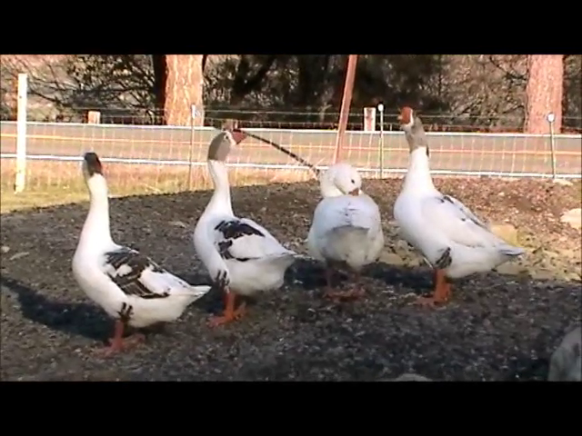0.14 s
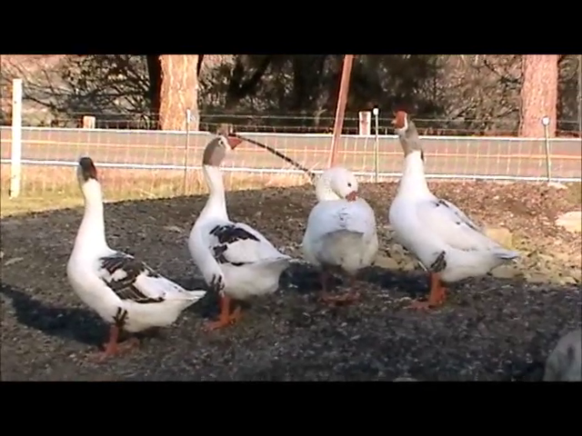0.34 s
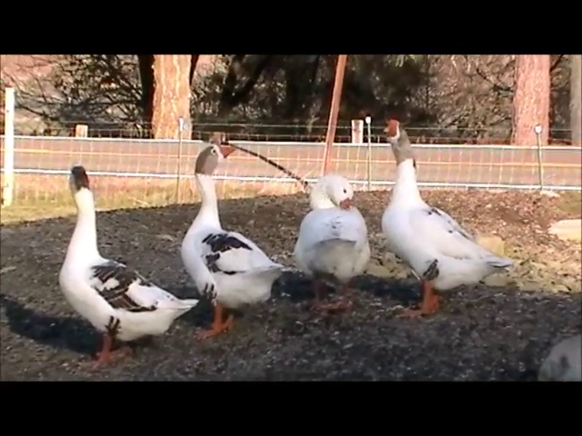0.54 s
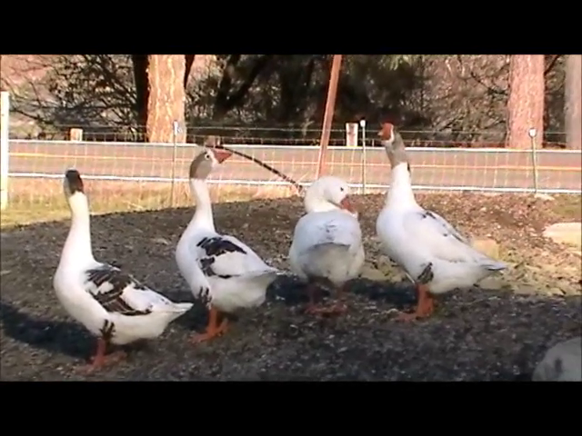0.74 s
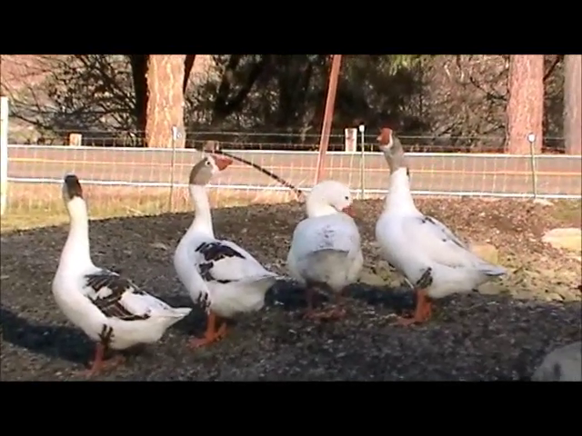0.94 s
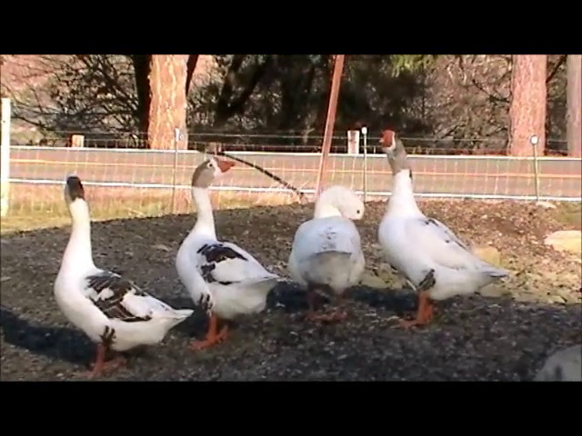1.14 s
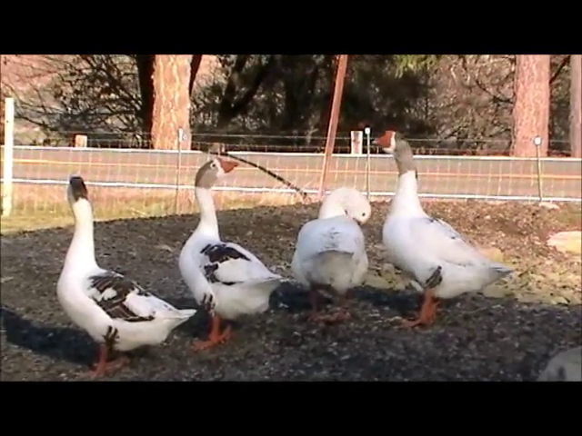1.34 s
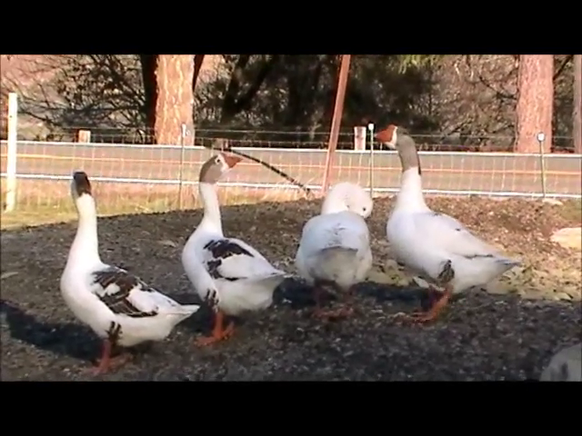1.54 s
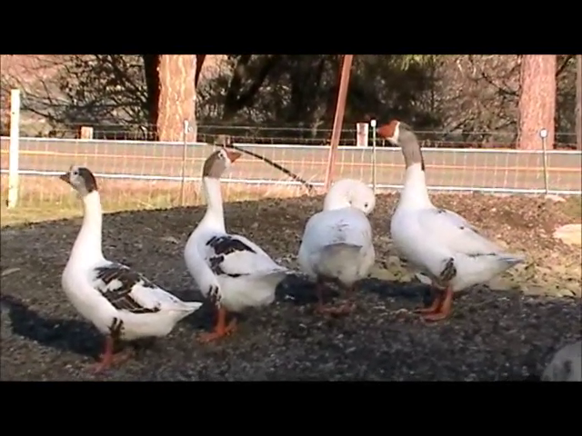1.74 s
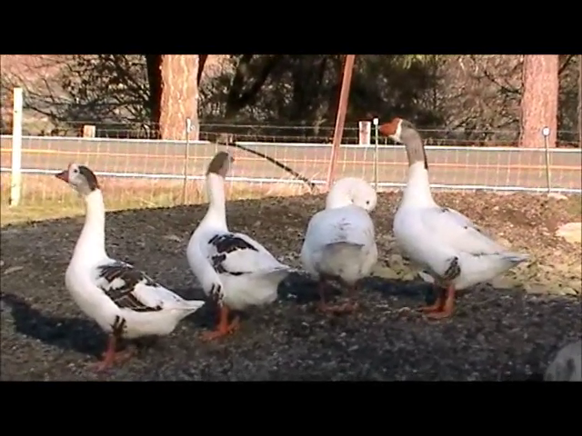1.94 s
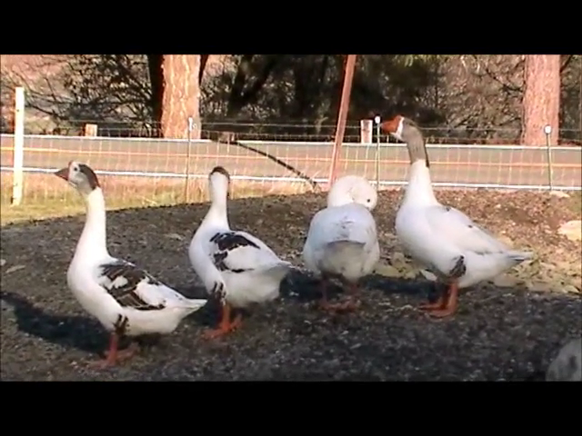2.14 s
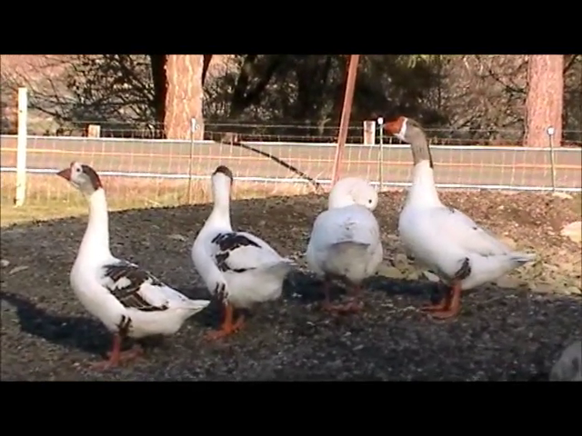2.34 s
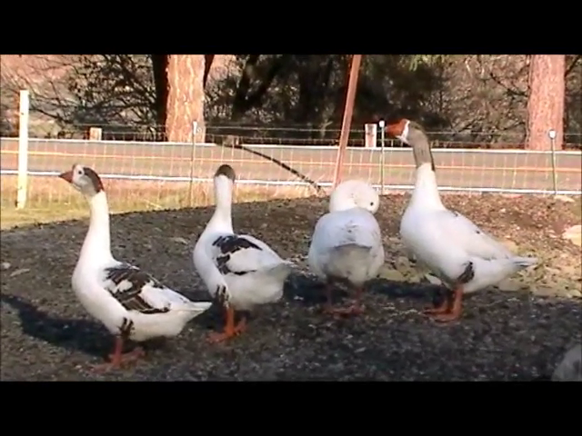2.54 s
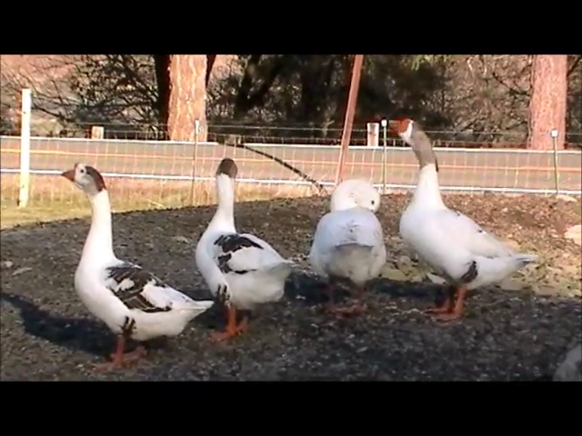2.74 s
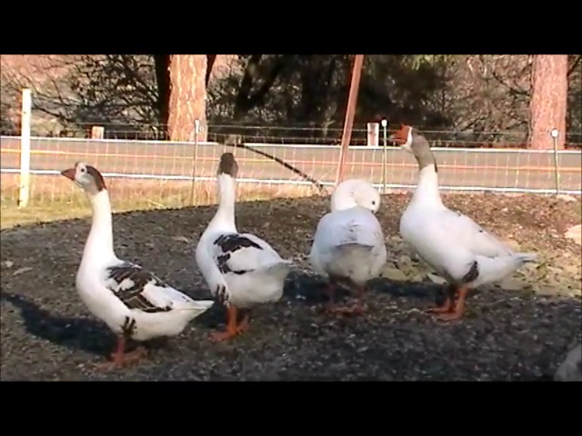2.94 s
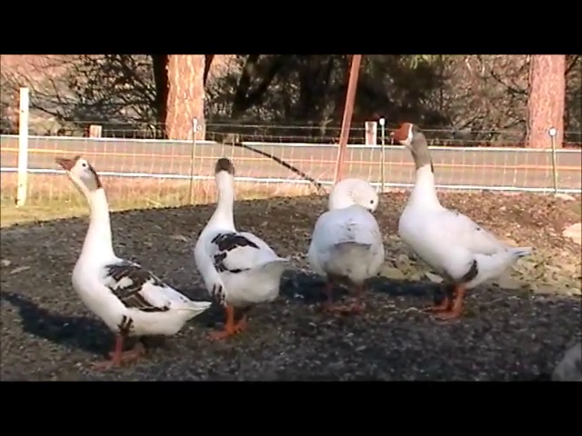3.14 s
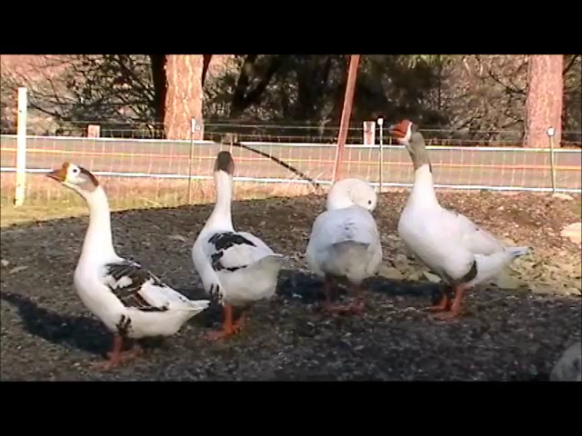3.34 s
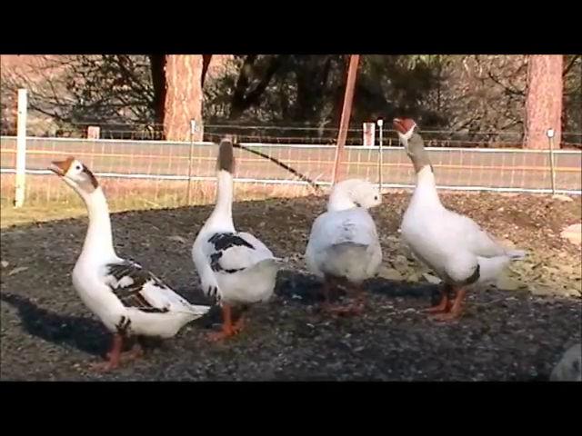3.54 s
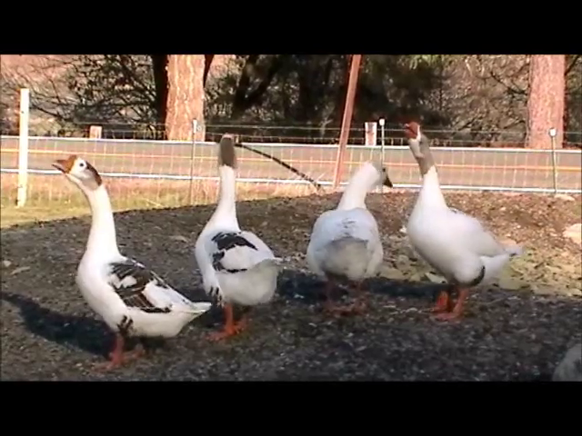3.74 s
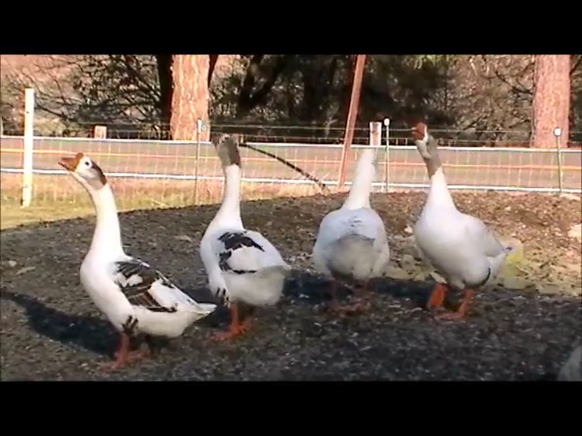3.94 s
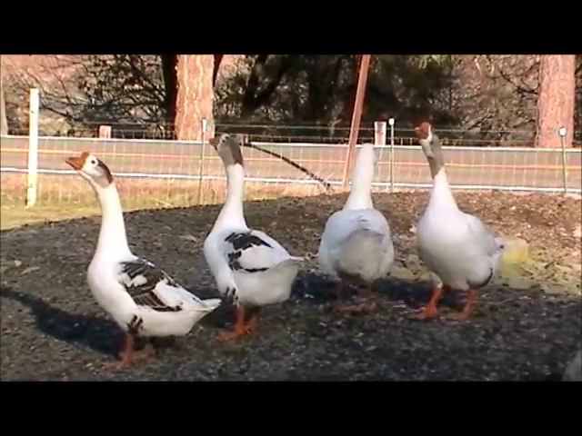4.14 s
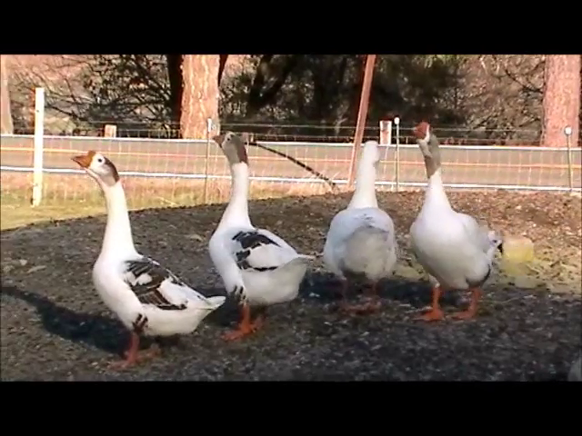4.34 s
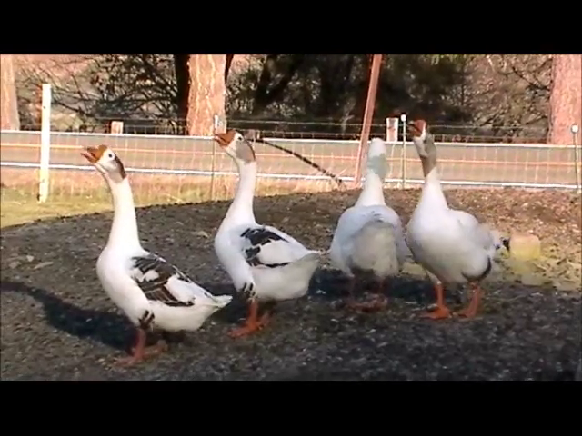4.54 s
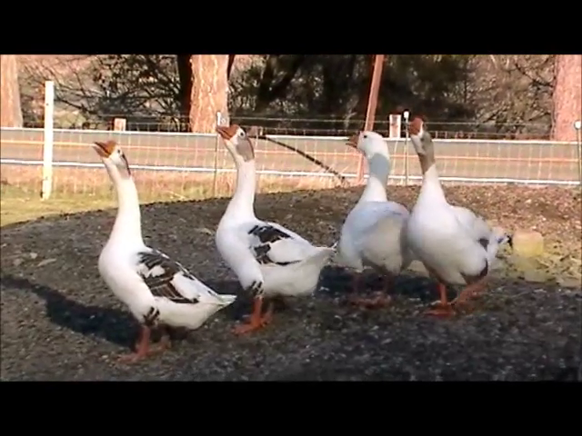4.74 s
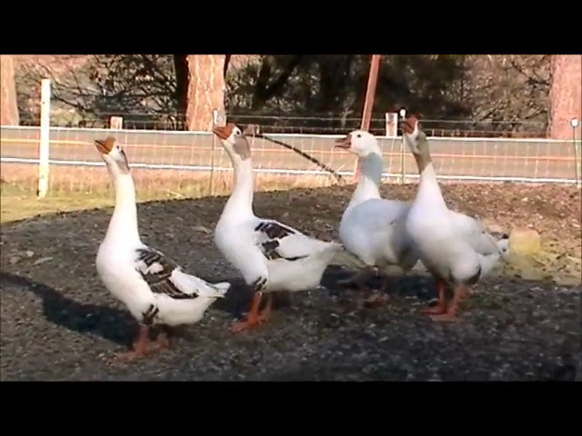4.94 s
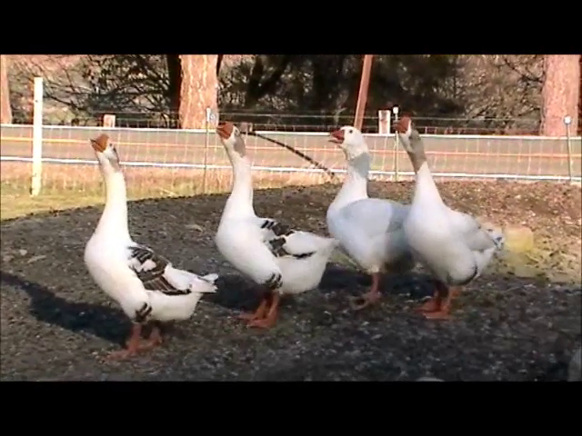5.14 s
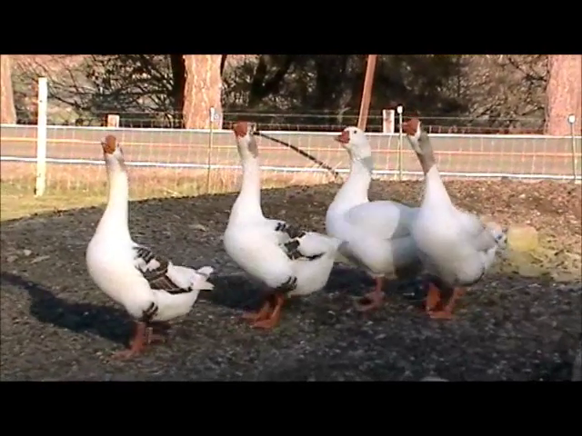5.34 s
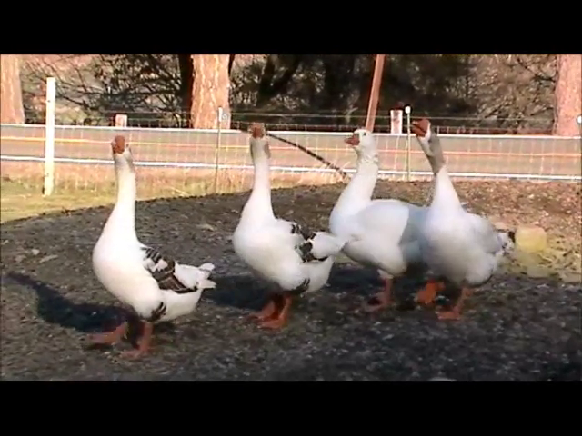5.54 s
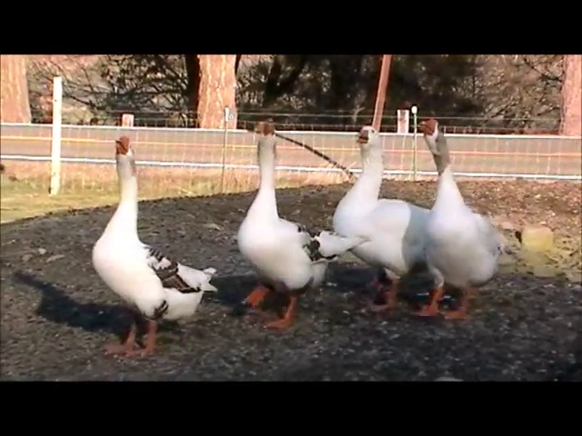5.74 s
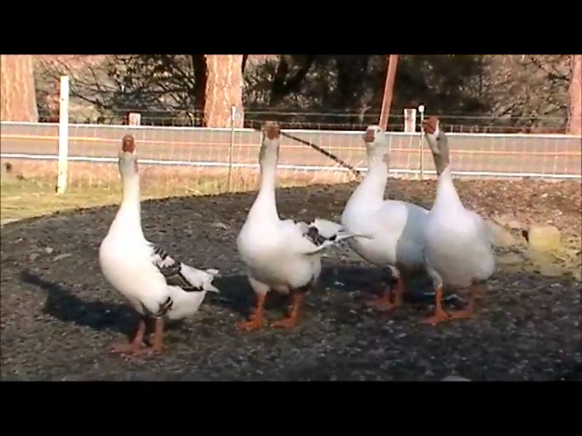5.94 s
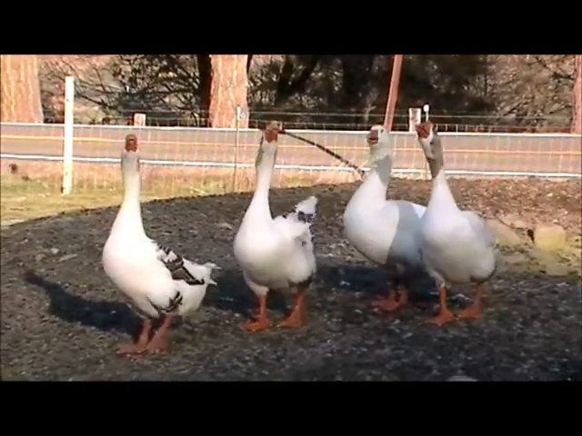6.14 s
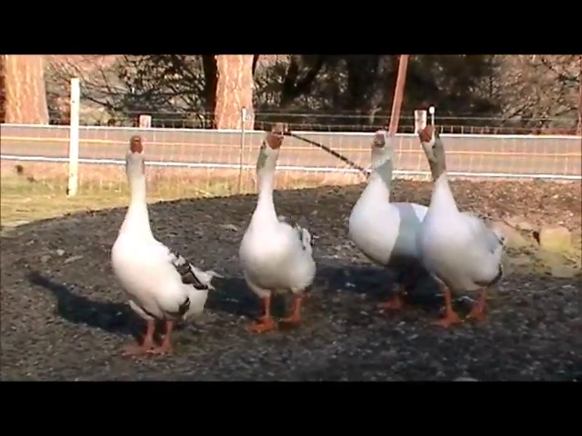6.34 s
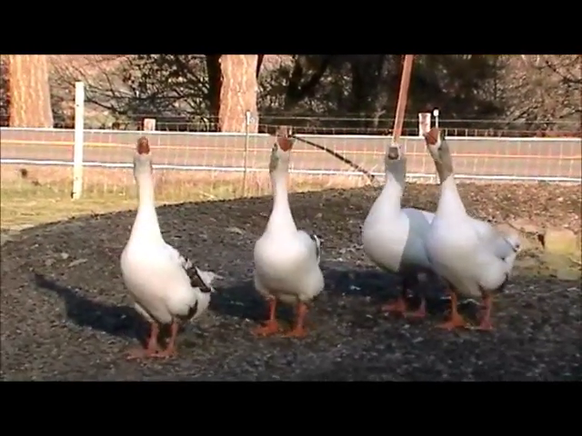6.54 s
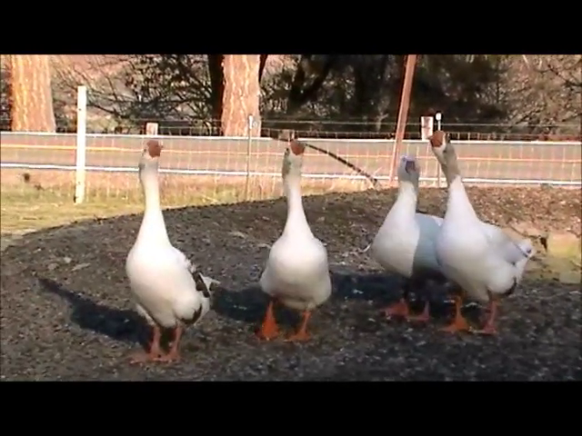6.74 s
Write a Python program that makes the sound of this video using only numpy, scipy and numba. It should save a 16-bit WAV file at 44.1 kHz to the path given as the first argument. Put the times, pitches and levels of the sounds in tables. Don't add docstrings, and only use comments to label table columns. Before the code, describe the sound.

Geese a few metres away honk in raspy, reedy bursts over soft outdoor hiss, with feet crunching gravel between the louder calls.

```python
import sys
import numpy as np
from scipy import signal
from scipy.fft import rfft, irfft
from scipy.io import wavfile
from scipy.ndimage import uniform_filter1d
from numba import njit

SR = 44100
rng = np.random.default_rng(int(sys.argv[2]) if len(sys.argv) > 2 else 0)


def boost_factor(decibels):
    exponent = np.asarray(decibels, float) / 20
    return 10 ** exponent


def dump(signal):
    limited = np.clip(np.atleast_2d(signal).T, -1, 1)
    pcm = np.round(limited * 32767).astype(np.int16)
    wavfile.write(sys.argv[1], SR, pcm)


N = 303408
TIME = np.arange(N) / SR

# (start [s], length [s], pipe level [dB], slap rate [Hz], fade over the syllable [dB])
HONKS = [(1.81, 0.17, -50, 154.3, 1), (1.915, 0.18, -36.5, 159.5, 28.5), (2.105, 0.22, -36, 165.3, 5),
         (2.31, .105, -42, 156, 11.5), (2.9, 0.096, -64, 155.1, -13), (2.985, 0.19, -31, 164.8, 20),
         (3.146, .19, -33.5, 156.3, 7.5), (3.452, 0.07, -46.5, 178.9, -3.5),
         (3.592, 0.058, -24.5, 168.5, 14.5), (3.66, 0.13, -43.5, 171.7, 0.5),
         (3.803, 0.048, -28.5, 183.7, 13), (3.925, 0.16, -35, 176.5, 2), (4.526, 0.15, -27, 184.3, 10.5),
         (4.645, .11, -28, 178.8, 10), (4.75, .18, -38.5, 175.1, 11), (4.953, 0.15, -48.5, 185.5, -8),
         (5.11, 0.15, -32, 169.2, 14), (5.585, 0.18, -32, 184.3, 8), (5.73, 0.18, -27, 174.8, 16),
         (5.91, 0.065, -60.5, 173.3, 15), (6.1, .17, -34.5, 182, -1.5), (6.265, .2, -29, 172, 16.5)]


@njit
def svf(x, hz, width):
    y = np.empty(len(x))
    b, l = 0., 0.
    for i in range(len(x)):
        g, k = np.tan(np.pi * hz[i] / SR), width / hz[i]
        v = (b + g * (x[i] - l)) / (1 + g * (g + k))
        b, l = 2 * v - b, l + 2 * g * v
        y[i] = k * v
    return y


def band(x, hz, width):
    hz = hz + np.zeros(len(x))
    return svf(svf(x, hz, 1. * width), hz, 1. * width)


def unit(x):
    return x / np.sqrt(np.mean(x ** 2))


def wander(count, rate):
    k = int(SR / rate)
    return unit(uniform_filter1d(uniform_filter1d(rng.standard_normal(count), k), k))


def shaped(points):
    hz, db = np.transpose(points)
    f = np.maximum(np.arange(N // 2 + 1) * SR / N, 1)
    return rfft(rng.standard_normal(N)) * boost_factor(np.interp(np.log(f), np.log(hz), db)), f


def note(start, length, fade):
    i = np.arange(int(start * SR), int((start + length) * SR))
    t = i / SR - start
    return i, t, length - t, np.clip(np.minimum(t, length - t) / fade, 0, 1)


def edges(t, left, attack, release):
    return np.clip(1 - t / attack, 0, 1) + np.clip(1 - left / release, 0, 1)


def air():
    # (frequency [Hz], level [dB per Hz])
    hiss_curve = [(15, -53), (25, -33), (70, -1), (352, 0), (710, -2.5), (2260, -5.5), (2810, -10),
                  (15800, -20.5)]
    # (frequency [Hz], side minus mid [dB])
    spread_curve = [(60, 2.5), (300, 2), (2400, -1.5), (5000, -15.5), (15000, -4.5)]
    # (frequency [Hz], width [Hz], level [dB])
    whine_bands = [(2396, 37, -78), (4680, 150, -85), (10050, 150, -94), (12500, 100, -83)]
    hiss_db = -66
    mid, f = shaped(hiss_curve)
    side, _ = shaped(hiss_curve)
    spread_hz, spread_db = np.transpose(spread_curve)
    side = side * boost_factor(np.interp(np.log(f), np.log(spread_hz), spread_db))
    mid, side = irfft(mid, N), irfft(side, N)
    gain = boost_factor(hiss_db + 0.15 * wander(N, 13.0)) / np.sqrt(np.mean(mid ** 2))
    whine = np.zeros(N)
    for hz, width, db in whine_bands:
        whine += boost_factor(db + 2 * wander(N, 3.6)) * unit(band(rng.standard_normal(N), hz, width))
    return gain * np.array([mid + side, mid - side]) + whine


def yard(x):
    # (delay [s], level [dB])
    echo_taps = [
        (0.332, -32),
        (.41, -35),
        (.52, -37.5),
    ]
    t = TIME[:60000]
    tail = np.exp(-t / 0.86) * np.clip(t / 0.15, 0, 1)
    response = boost_factor(-67.5) * rng.standard_normal((2, len(t))) * tail
    response[1] = 0.49 * response[0] + 0.58 * response[1]
    for delay, db in echo_taps:
        at = int(delay * SR)
        smear = rng.standard_normal(1500) * np.exp(-t[:1500] / .012)
        response[:, at:at + 1500] += boost_factor(db - 25.0) * smear
    dull = signal.sosfilt(signal.butter(2, [550, 3600], "band", fs=SR, output="sos"), x)
    return signal.fftconvolve(dull[None], response, axes=1)[:, :N]


def steps():
    # (time [s], thud level [dB], thud pitch [Hz], grit level [dB])
    footfalls = [
        (1.48, -48, 238, -52),
        (2.755, -38, 167, -35),
        (3.401, -39, 211.6, -42.5),
        (4.139, -90, 171, -37.5),
        (4.198, -58, 177, -38.5),
        (4.297, -37, 220, -38),
        (4.442, -51, 205.5, -41),
        (5.415, -54, 390, -34.5),
    ]
    out, t = np.zeros(N), TIME[:3000]
    for start, db, hz, grit_db in footfalls:
        thud = boost_factor(db) * np.sin(2 * np.pi * hz * t) * np.exp(-t / 0.0047) * np.clip(t / 0.00083, 0, 1)
        grit = boost_factor(grit_db - 6) * band(rng.standard_normal(3000), 1570.0, 3700.0) * np.exp(-t / 0.012)
        out[int(start * SR):][:3000] += svf(thud, hz + 0 * t, 440.0) + grit
    return out


def squeaks():
    # (time [s], level [dB], pitch [Hz], length [s])
    peeps = [
        (4.527, -29.5, 2857, 0.0081),
        (4.949, -28.5, 3070, 0.0091),
        (5.5826, -21.5, 2820, 0.0099),
        (6.098, -23.5, 2773, 0.019),
    ]
    out, t = np.zeros(N), TIME[:2000]
    for start, db, hz, length in peeps:
        phase = 2 * np.pi * hz * (t + 1.57 * t ** 2) + 0.97 * wander(2000, 530)
        shape = np.clip(t / 0.0027, 0, 1) * np.clip((length + 0.007 - t) / 0.0048, 0, 1)
        out[int(start * SR):][:2000] += boost_factor(db) * shape * (np.sin(phase) + 0.44 * np.sin(2 * phase))
    return out


def whistles(turns):
    # (start [s], length [s], first pitch [Hz], held pitch [Hz], fundamental [dB])
    reeds = [(1.823, 0.14, 711, 828, -49), (1.996, 0.2, 762, 793, -52.5), (2.888, 0.21, 1042, 1221, -46.5),
             (3.25, .095, 1213, 1206, -33.5), (3.461, 0.068, 1235, 1342, -35),
             (3.505, 0.11, 1610, 1713, -26), (3.597, 0.11, 771, 828, -44), (3.606, 0.14, 1168, 1312, -36.5),
             (3.681, 0.091, 1916, 1940, -30.5), (3.74, 0.068, 852, 818, -37.5),
             (3.81, 0.053, 1700, 1829, -40), (3.845, 0.0964, 1702, 1771, -26), (4.704, 0.25, 932, 968, -39),
             (4.72, 0.17, 829, 863.4, -35), (4.675, 0.14, 1205, 1268, -41),
             (4.959, 0.14, 1643, 1779, -31.5), (5.05, 0.091, 1214, 1269, -33.5),
             (5.129, 0.14, 922, 937, -31), (5.74, 0.23, 618, 649.6, -79), (5.949, 0.046, 982, 763, -44),
             (6.245, .24, 1235, 1304, -37), (6.341, 0.14, 2322, 2286, -38.5),
             (3.945, .155, 1195, 1306, -36), (3.935, .16, 678, 694, -44.5)]
    # (partials 2, 3, 4 [dB re the fundamental], upper series [dB re the third or fourth],
    # final droop of pitch [0-1])
    reed_tones = [(-12, -13, -32, -10, .08), (-22, -13, -42, -18, .001), (-22, -22, -35, -0.5, 0.2),
                  (2.5, -10.5, -13.5, -16.5, .09), (-2, -8, -34, -14, 0), (-14, -15, -9, -12.5, .001),
                  (9.5, 7, 8, -19, 0.03), (-7, -10, -18, -21, 0.09), (-11.5, -30.5, -32, 3, .02),
                  (-10, -4.5, -23, -24, 0.05), (11, -1.5, -2, -11, .001), (-16, -11, -7.5, -13, 0.03),
                  (2, -11, -4.5, 4, 0.24), (-18, -44, -29, -16, 0.04), (1, -22, -31, -25, .001),
                  (-9, -23, -13, -13, 0.03), (-9.5, -18, -30, -5, .001), (-15, -10, -16, -16, .19),
                  (41.5, 23, 41, -10, .02), (-19, -1, -25, -5.5, 0.05), (-3, -10, -13, -7, .11),
                  (-9, -17, -56, -11, 0.05), (-4.5, -13, -22, -12, .08), (0, -1.5, -10, -15, 0.14)]
    glide_share, glide_bend = .92, 1.35
    break_hz, droop_s = 1500, 0.0515
    droop_db, shrill_droop_db = 45, 220
    attack_share, release_s, edge_db = 0.22, 0.021, 7.5
    swell_db, throb, breath_db = 10, .13, -26
    out = np.zeros(N)
    for (start, length, first_hz, held_hz, db), (*above_db, shrill_db, droop) in zip(reeds, reed_tones):
        i, t, left, gate = note(start, length, .007)
        droop = droop * (held_hz < break_hz) * np.clip(1 - left / droop_s, 0, 1) ** 1.64
        glide = np.clip(1 - t / (glide_share * length), 0, 1) ** glide_bend
        hz = (held_hz + (first_hz - held_hz) * glide) * (1 - droop)
        wobble = .15 * (hz / 1700) ** 1.5 * np.sin(2 * np.pi * turns[i])
        phase = 2 * np.pi * np.cumsum(hz * (1 + .0015 * wander(len(i), 150))) / SR + wobble

        db = db - edge_db * edges(t, left, attack_share * length, release_s) - droop_db * droop
        db = db + np.c_[[0, *above_db]]
        swell = swell_db * (t / length - .5)
        top_db = np.maximum(db[2], db[3]) + shrill_db
        top_db = np.minimum(top_db, np.maximum(db[0], db[1]) - 4)
        top_db = top_db + swell - shrill_droop_db * droop
        db[1:] += swell / 2

        gate = gate * (1 + throb * np.cos(2 * np.pi * turns[i]))
        breath = unit(band(rng.standard_normal(len(i)), 3100.0, 13500.0))
        out[i] += gate * boost_factor(db.max(axis=0) + breath_db) * breath
        for k in range(1, 17):
            level_db = db[k - 1] if k < 5 else top_db - 2.2 * (k - 6) * hz / 1000
            size = boost_factor(level_db + 4 + 1.5 * wander(len(i), 60)) * (k * hz < 15500)
            out[i] += gate * size * np.sin(k * phase + k * k)
    return out


def slap_phase():
    sag_hz_per_s = 40
    rate = np.full(N, 1. * HONKS[0][3])
    for start, length, _, hz, _ in HONKS:
        later = TIME >= start
        rate[later] = hz - sag_hz_per_s * np.minimum(TIME[later] - start, length)
    return np.cumsum(rate * (1 + .012 * wander(N, 60))) / SR


def membrane(turns):
    cycle = np.floor(turns).astype(int)
    size = boost_factor(1.6 * rng.standard_normal(cycle[-1] - cycle[0] + 1))[cycle - cycle[0]]
    hits = size * np.diff(cycle, prepend=cycle[0])
    rattles = rng.standard_normal((2, 400)) * np.exp(-TIME[:400] / .0022)
    blend = 1.1 * wander(len(turns), 14)
    slaps = np.zeros(len(turns))
    for weight, rattle in zip((np.cos(blend), np.sin(blend)), rattles):
        slaps += np.convolve(hits * weight, rattle)[:len(turns)]
    puffs = size * (.5 + np.exp(-(turns % 1) / .5)) * rng.standard_normal(len(turns))
    return unit(slaps), unit(puffs), size


def windpipe(clear, hz, width, rough):
    main = band(band(clear, hz, 1.5 * width), hz, 2 * width)
    return unit(main + .33 * rough ** .5 * band(clear, 540., 110.))


def beak_ring(clear, hoarse, hz):
    return unit(band(clear, hz, 480.) + .4 * band(band(hoarse, 2100., 1900.), 2100., 2600.))


def blare_ring(hoarse, modes_hz, ring, size, turns):
    # (frequency [Hz], width [Hz], level [dB])
    blare_bands = [(3790, 147, 12), (4340, 190, 9.5), (6080, 980, 9), (6630, 4760, 14), (8500, 1500, -16)]
    overtones, wide = np.zeros(len(turns)), np.zeros(len(turns))
    for k in range(3, 7):
        overtones += (-1) ** k * svf(hoarse, k * modes_hz / 2, 207.0) / (k - 2) ** .5
    for hz, width, db in blare_bands:
        wide += boost_factor(db) * band(rng.permutation(hoarse), hz, 2 * width) / width ** .5
    wide = wide * (size + np.cos(2 * np.pi * turns) / 2)
    treble = signal.butter(4, 2900, "high", fs=SR, output="sos")
    return unit(signal.sosfilt(treble, ring * unit(overtones) + (1 - ring) * unit(wide)))


def rasp(turns):
    # (turbulent share [0-1], beak [Hz], beak [dB], blare [dB], chest [dB]),
    # levels relative to the pipe
    throats = [(.08, 1870, -17.5, -13.5, -24), (.08, 2420, -27, -37, -25), (.08, 2340, -15, -23, -24),
               (0.079, 2280, -31, -27, -13), (.14, 2410, 1, -8, -21), (.14, 2030, -19, -21.5, -17.5),
               (.14, 2257, -5, -11.5, -13), (.4, 2510, 8.5, 8, -12.5), (.4, 1930, -6, -3.5, -16.5),
               (.4, 2235, 3.5, -2, -21), (.1, 2294, -9, 0, -21), (.1, 2280, -0.5, -3, -25),
               (.22, 1787, -3, -4, -13), (.22, 1938, -1, -0.5, -16.5), (.22, 2300, -1.5, 0.5, -19),
               (.25, 1863, 12, 14.5, -8.5), (.35, 2214, -0.7, -3.5, -14.5), (.15, 1750, 1.5, 1.8, -8.5),
               (.22, 1970, -4.5, -1, -16.5), (.22, 2230, 18, 22.5, -1), (.18, 1760, 2, 3, -12),
               (.24, 2131, -3, -1.5, -21.5)]
    soft_db, loud_db = -60, -32
    pipe_ends_hz, width_ends_hz, ring_ends = (930, 1000), (260, 460), (.9, .6)
    pipe_attack_s, blare_attack_s, edge_db = 0.021, 0.0065, 25
    release_s, blare_release_s = .025, 0.035
    lazy_attack = 2.6
    treble_fade, chest_fade = 0.52, 1.02
    snap_hz, snap_s = 373, 0.016
    rise, rise_s = 0.244, 0.024
    out, chest = np.zeros(N), np.zeros(N, complex)
    next_starts = np.append(np.transpose(HONKS)[0], np.inf)[1:]
    for honk, throat, after in zip(HONKS, throats, next_starts):
        start, length, db, _, fade_db = honk
        rough, beak_hz, beak_db, blare_db, chest_db = throat
        i, t, left, gate = note(start, length + release_s, .003)
        last = after > start + length + release_s
        fresh = not out[i[0] - 1]

        force_db = db + blare_db
        pipe_hz = np.interp(force_db, (soft_db, loud_db), pipe_ends_hz)
        width = np.interp(force_db, (soft_db, loud_db), width_ends_hz)
        ring = np.interp(force_db, (soft_db, loud_db), ring_ends)
        lazy = np.interp(force_db, (soft_db, soft_db + 10), (lazy_attack, 1))

        slow = db - edge_db * edges(t, left, pipe_attack_s * lazy, release_s)
        quick_release = blare_release_s if last else release_s
        quick = db - edge_db * edges(t, left, blare_attack_s * lazy, quick_release)
        fade_db = fade_db * t / length
        pipe_db = slow - fade_db
        chest_db = slow + chest_db - chest_fade * fade_db
        beak_db = (slow + quick) / 2 + beak_db - treble_fade * fade_db
        blare_db = quick + blare_db - treble_fade * fade_db

        modes_hz = beak_hz * (1 - rise * fresh * np.exp(-t / rise_s))
        beak_hz = beak_hz + snap_hz * np.exp(-t / snap_s)
        pipe_hz = pipe_hz * (1 - .2 * last * np.exp((i - i[-1]) / SR / .05))

        slaps, puffs, size = membrane(turns[i])
        clear = (1 - rough) ** .5 * slaps + rough ** .5 * puffs
        hoarse_share = rough ** .5
        hoarse = (1 - hoarse_share) ** .5 * slaps + hoarse_share ** .5 * puffs
        pipe = windpipe(clear, pipe_hz, width, rough)
        beak = beak_ring(clear, hoarse, beak_hz)
        blare = blare_ring(hoarse, modes_hz, ring, size, turns[i])
        out[i] += gate * (boost_factor(pipe_db) * pipe - boost_factor(beak_db) * beak + boost_factor(blare_db) * blare)
        tremble = boost_factor(3.5 * wander(len(i), 58))
        chest[i] += gate * tremble * boost_factor(chest_db + 3) * np.exp(2j * np.pi * turns[i])
    return out, chest


def scene():
    turns = slap_phase()
    voice, chest = rasp(turns)
    voice = voice + whistles(turns) + squeaks()
    side = boost_factor(-17.0) * svf(voice, 1140.0 + 0 * TIME, 1220.0)
    side -= boost_factor(-13) * svf(voice, 110.0 + 0 * TIME, 580.0)
    side += boost_factor(-28.5) * np.roll(voice, 5)
    ports = np.array([[boost_factor(-3.5) * np.exp(.4j)], [boost_factor(-1.0) * np.exp(-.4j)]])
    hum = np.real(chest * ports)
    return voice + np.array([side, -side]) + hum + yard(voice) + steps() + air()


def band_limit(x):
    return signal.sosfilt(signal.butter(12, 15950, fs=SR, output="sos"), x)


def record(dry):
    mic_top_hz = 11400
    mix = signal.sosfilt(signal.butter(1, mic_top_hz, fs=SR, output="sos"), dry)
    return band_limit(mix)


dry = scene()
out = record(dry)
dump(out)
```